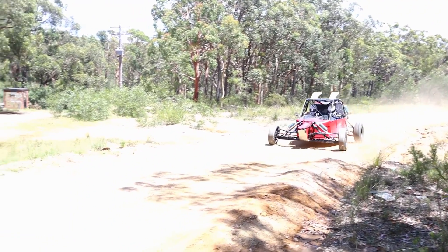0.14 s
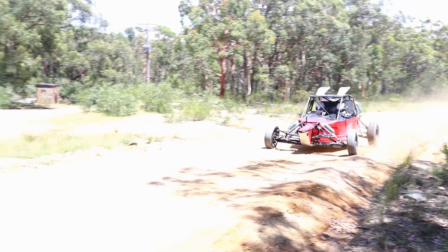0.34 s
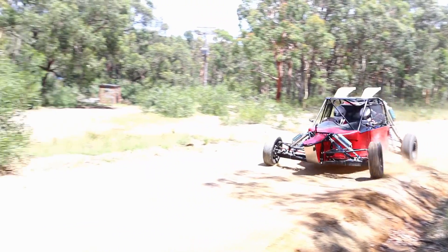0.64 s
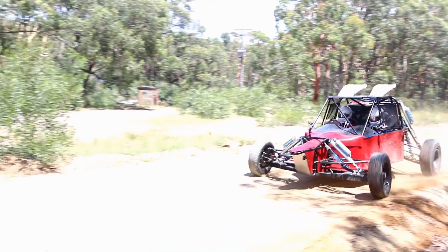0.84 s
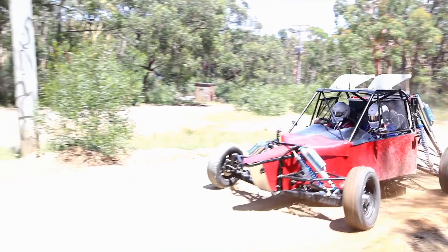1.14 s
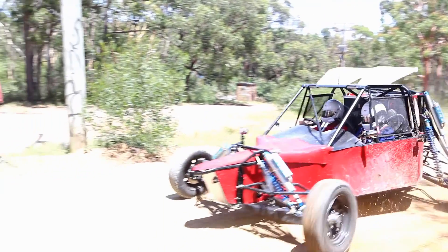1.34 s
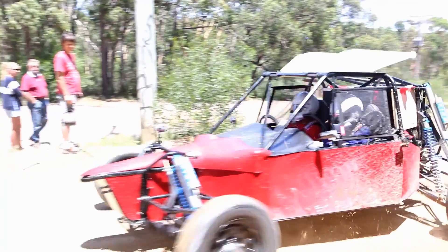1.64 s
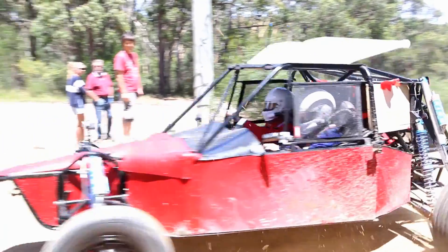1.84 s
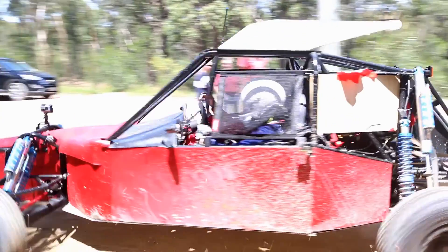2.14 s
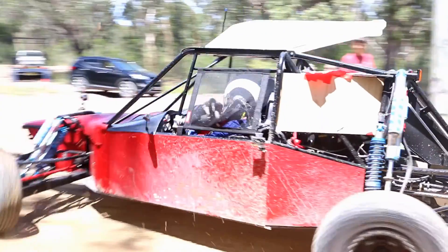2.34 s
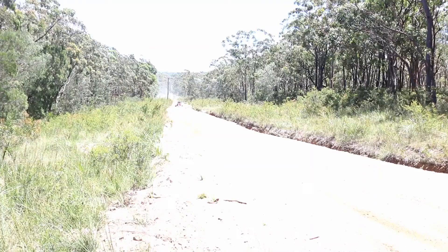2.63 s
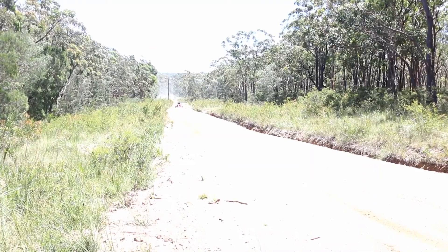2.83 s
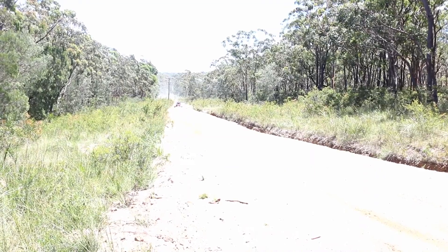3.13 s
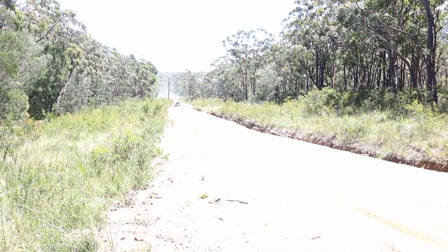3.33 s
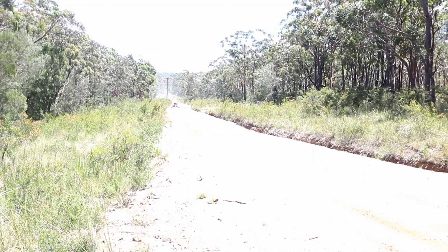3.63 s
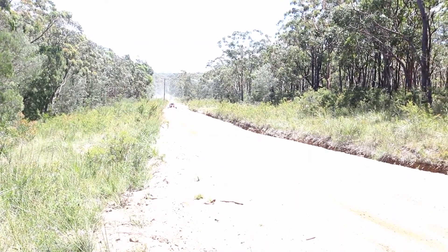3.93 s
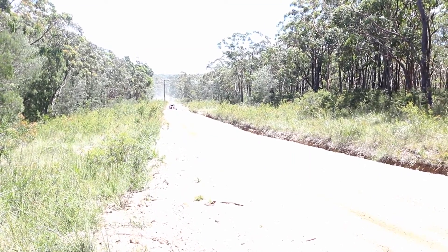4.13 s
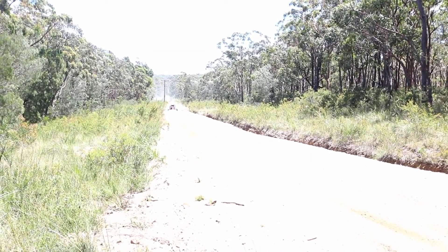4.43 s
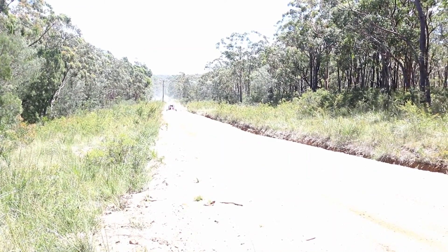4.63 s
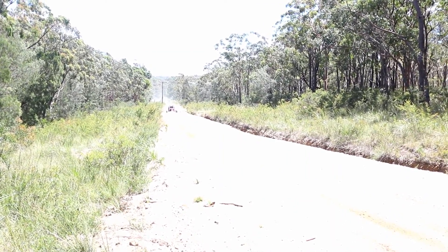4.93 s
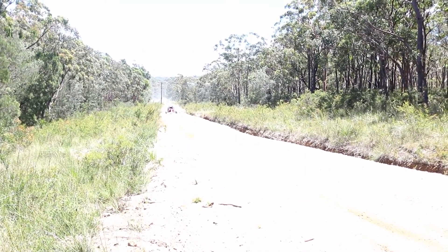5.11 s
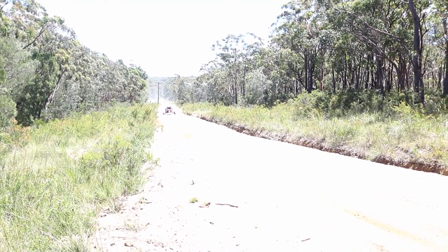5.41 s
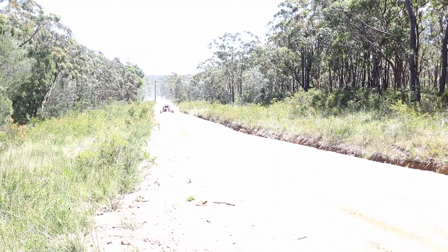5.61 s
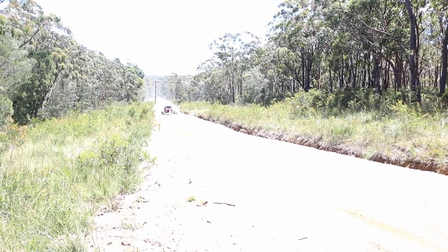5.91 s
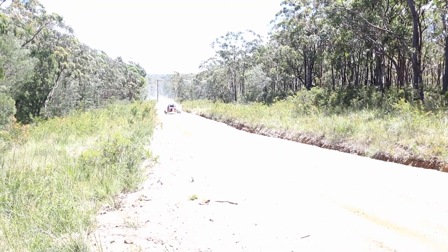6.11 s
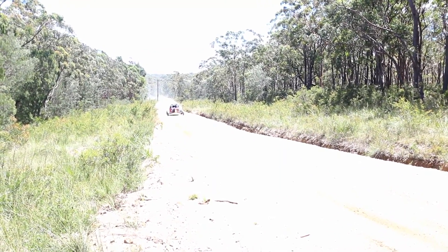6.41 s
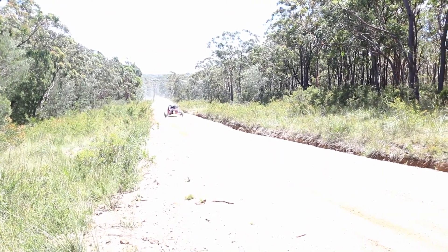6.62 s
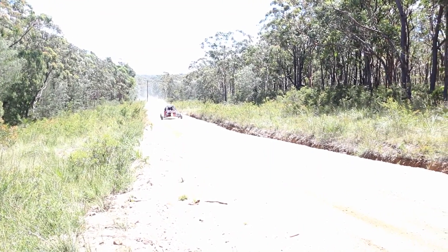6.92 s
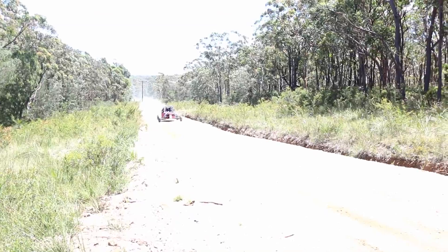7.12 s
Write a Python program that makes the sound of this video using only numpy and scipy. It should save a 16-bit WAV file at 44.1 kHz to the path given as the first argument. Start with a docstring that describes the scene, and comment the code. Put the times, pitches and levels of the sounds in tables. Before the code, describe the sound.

A close stereo outdoor pickup opens on a buggy coasting into a dirt bend, its low, uneven four-cylinder burble falling in pitch. From about 0.1 to 1.6 s tyres scrub and judder with gritty surges and a hollow howl, while stones tick and spray, stronger on the right. At 1.0 s the throttle blips briefly; the revs jump, then sink again. Valve clatter and a thin, descending whine emerge from 1.6 s. Around 2.3 s the engine lugs and pulls away with rapid sharp cracks. At 2.7 s a hard cut: a much quieter, distant engine growls at high revs, climbing with brief lifts until 3.8 s. It eases, shifts up at about 4.2 s and drops in pitch, then climbs steadily, louder and nearer, its note wobbling over washboard, with a hissing roar peaking near 6.5 s. It lifts off at 6.9 s. Trees echo; forest air and faint insect rasps remain.

```python
"""A flat-four dirt buggy, close by: its exhaust burbles through a bend, blips once on the way and pulls away.
At 2.7 s the place changes: far off at first, it races up a forest straight, shifts up and lifts off.
Clicks from four uneven cylinders ring pipe resonances; at full throttle gliding harmonics make a growl.
Filtered noise gives the scrubbing tyres, valve clatter, stones, cracks and distant roar. Trunks echo the
exhaust, an insect rasps and forest air lies under both places. The microphone has two ports."""
import sys
import numpy as np
from scipy import signal
from scipy.fft import rfft, irfft
from scipy.io import wavfile
from scipy.ndimage import uniform_filter1d

SR = 44100
rng = np.random.default_rng(int(sys.argv[2]) if len(sys.argv) > 2 else 0)


def put_to_file(sound):
    """Save the sound as 16-bit audio at rate SR, in the file named by the first command-line argument."""
    columns = np.atleast_2d(sound).T  # one column per channel
    safe = np.clip(columns, -1, 1)
    whole_steps = np.round(safe * 32767)
    wavfile.write(sys.argv[1], SR, whole_steps.astype(np.int16))


N = 320166
T, HZ = np.arange(N) / SR, np.fft.rfftfreq(N, 1 / SR)
CUT_S = 2.706  # from the bend to the straight

# how the engine runs, by manner: per cylinder strength [relative] and lag_ms; pipe [pitch_hz, width_hz];
# rough [share of strength], jitter_ms; leak_db past the silencer, hum_db at the firing rate;
# order [multiple of engine speed] and tone_db of the clean tones
MANNERS = { "coast": dict(strength=[0.44, 0.38, 0.75, .7], lag_ms=[-1.2, 0.17, 1.75, 1.9],
           pipe=[(131.4, 50), (196, 39), (169, 240)],
           rough=0.031, jitter_ms=.04, leak_db=-56.5, hum_db=-15.5, order=[7, 9, 10, 12],
           tone_db=[-17, -11, -13, -16.5]), "overrun": dict(strength=[0.28, .35, 0.65, 1],
           lag_ms=[0, 0, 0, 0], pipe=[(132.5, 14), (198.5, 25.5), (169, 350)],
           rough=0.074, jitter_ms=0.054, leak_db=-49, hum_db=-18.5, order=[], tone_db=[]),
           "blip": dict(strength=[0.79, 0.62, 0.7, 0.35], lag_ms=[0.41, -0.21, 0.64, -1.5], pipe=[(145, 12),
           (205, 27), (295, 110)], rough=0.054, jitter_ms=0.72, leak_db=-32, hum_db=-23, order=[12],
           tone_db=[-7.5]), "lug": dict(strength=[0.41, 0.44, 0.25, 0.81], lag_ms=[2.5, 1, -4, 0],
           pipe=[(128, 30), (201, 27.5), (220, 1400)],
           rough=0.078, jitter_ms=0.094, leak_db=-60, hum_db=-17.5, order=[], tone_db=[]),
           "pull": dict(strength=[0.65, 0.7, 0.76, 1.5], lag_ms=[.2, .6, 0.0094, 0.0041], pipe=[(120, 40),
           (217, 100), (310, 110)], rough=.35, jitter_ms=0.65, leak_db=-22, hum_db=-34, order=[],
           tone_db=[]), "lift": dict(strength=[0.68, 0.3, 0.24, 0.081], lag_ms=[0, .48, 1.57, 2.24],
           pipe=[(132, 29), (212, 36.5), (302, 117)],
           rough=0.044, jitter_ms=0.21, leak_db=-57.5, hum_db=-29, order=[5], tone_db=[-17.5])}
# the driver's moves: start_s, manner, throttle_db
MOVES = [(0, "coast", 0), (0.998, "blip", 8), (1.037, "blip", 11), (1.128, "coast", 2.5),
         (1.63, "overrun", 4), (2.019, "coast", 1.5), (2.25, "lug", 8), (2.34, "lug", 9.5),
         (2.707, "pull", -3), (3.597, "lift", -21), (3.645, "pull", -5.5), (3.799, "lift", -10),
         (4.15, "pull", -6), (4.215, "pull", -2), (6.938, "lift", -6.5)]
# engine speed through the bend, sinking but for the blip and the final pull: time_s, speed_cycles_per_s
# (one cycle is four strokes)
BEND_SPEED = [(0, 22.54), (.16, 21.86), (.4, 19.59), (.66, 16.25), (.85, 14.92), (1, 13.14), (1.06, 17.17),
              (1.13, 18.3), (1.35, 16.49), (1.6, 14.51), (1.9, 12.37), (2.25, 9.85), (2.4, 10.51),
              (2.7, 12.18)]
# engine speed up the straight, falling at the upshift; before wheel hop: time_s, speed_cycles_per_s
STRAIGHT_SPEED = [(2.71, 28.6), (2.78, 29.1), (2.86, 30.9), (2.97, 32.4), (3.13, 32.6), (3.38, 38.1),
                  (3.48, 38.6), (3.54, 43.2), (3.61, 40.6), (3.65, 42.4), (3.71, 41.1), (3.8, 44.2),
                  (3.87, 44.6), (4.16, 40.8), (4.22, 29.9), (4.3, 28.7), (4.37, 26.5), (4.55, 26.2),
                  (4.63, 24.8), (5, 26.43), (5.3, 27.06), (5.55, 28.1), (5.8, 30.1), (6.11, 32.2),
                  (6.19, 35.2), (6.3, 37), (6.76, 37.3), (6.85, 38.7), (6.93, 41), (7.26, 37)]
# washboard stretches, where the wheels hop and the revs swing: start_s, end_s, depth [share of speed]
WASHBOARD = [(4.37, 4.85, .014), (5.8, 6.085, .04), (6.23, 6.73, .022)]
HOP_HZ = 7
# exhaust level by distance, before throttle and revs: time_s, level_db
BEND_NEARNESS = [(0, -38.5), (1.3, -38), (2.7, -38.5)]
STRAIGHT_NEARNESS = [(2.71, -49.5), (3.2, -50.5), (3.5, -48), (4.2, -50), (4.55, -49), (5.1, -46.5),
                     (5.7, -40.5), (6, -41), (6.3, -39), (6.8, -40.5), (7.26, -44.5)]
REV_DB_PER_OCTAVE, CRUISE_HZ = 5.5, 20.3  # louder with the revs; no change at the cruising speed
CHAMBER_HZ, CHAMBER_WIDTH_HZ = 215, 104  # the silencer's chamber spreads each pulse without colouring it
HUM_LOW_HZ = 48.7  # the hum thins out below this firing rate
NEAR_ECHO_DB, STRAIGHT_ECHO_DB = -14, -14  # trees round the bend, trees along the straight
# microphone ports, close and far: likeness [pitch_hz, 0-1], balance [pitch_hz, left_minus_right_db],
# phase [pitch_hz, right_lag_radians]
NEAR_PORTS = ([(150, 1), (950, .99), (2400, .85), (6000, .4), (15000, .3)], [(400, .6), (1000, .4),
              (2400, -1), (6000, -5.5), (15000, -13)], [(200, 0), (1000, -.3), (2000, -.7), (3600, -1.3),
              (6000, -2.2)])
FAR_PORTS = ([(60, .95), (400, .99), (950, .95), (2400, .6), (6000, .1)], [(60, 1), (400, .3),
             (6000, -1.5)], [(500, 0), (2400, .2), (7500, 1.5)])
# valve gear and fan close by: time_s, level_db
CLATTER_LEVEL = [(0, -53.5), (.8, -69.5), (1.6, -53), (1.8, -54.5), (1.95, -52), (2.2, -55.5), (2.4, -51),
                 (2.55, -52.5), (2.7, -49.5)]
# their colour: pitch_hz, relative_db
CLATTER_COLOUR = [(200, 2.5), (330, 7.5), (450, 1.5), (620, -8.5), (980, -3.5), (1660, -14.5), (2330, -14),
                  (3720, -18.5), (4500, -18), (6220, -23.5), (11700, -41), (15000, -54.5)]
# a thin whine: time_s, pitch_hz, level_db
WHINE = [(1.5, 4750, -90), (1.8, 4660, -66.5), (2.05, 4620, -66), (2.2, 4580, -74), (2.4, 4380, -64.5),
         (2.7, 4340, -63)]
# colour of the forest air: pitch_hz, relative_db
FOREST_COLOUR = [(30, -34), (70, -2), (150, 7), (400, -13.5), (1000, -10.5), (3000, -23.5), (6000, -34.5),
                 (15000, -60)]
# tyres sliding on dirt, before trim: time_s, level_db
SCRUB = [(0.13, -56), (0.138, -49), (0.232, -41.5), (0.306, -44), (0.342, -37.5), (0.416, -41),
         (0.452, -37.5), (0.522, -40), (0.612, -50.5), (0.666, -41.5), (0.768, -48.5), (0.834, -42.5),
         (1.074, -43), (1.264, -38.5), (1.288, -43.5), (1.546, -43.5), (1.562, -50.5), (1.6, -48.5)]
GRIP_S = .2  # the slide builds up until this time
# the tread catches and surges, before trim: time_s, peak_db
BITES = [(0.168, -50), (0.332, -47), (0.448, -41), (0.5, -48), (0.633, -41), (0.692, -41), (1.178, -40),
         (1.208, -41), (1.236, -43), (1.327, -44), (1.51, -46), (1.581, -36)]
# tyre colour entering and leaving the bend: pitch_hz, relative_db
SCRUB_IN = [(100, -40), (250, -2), (400, -13), (520, -20.5), (700, -5), (920, -2), (1150, -14.5),
            (1420, -8), (1750, -20), (2050, -19.5), (3000, -27), (6000, -34), (10000, -49), (15000, -60)]
SCRUB_OUT = [(100, -38), (250, -4), (470, -8), (610, -13), (800, -4), (1020, -1), (1250, -18.5),
             (1700, -17), (3000, -25), (6000, -34.5), (10000, -54), (15000, -71)]
# larger stones hitting the chassis, before trim and balance: start_s, peak_db, pitch_hz
STONES = [(0.162, -47, 4970), (0.3726, -48, 5380), (0.483, -39.5, 3100), (0.51, -45, 3000),
          (0.7144, -58, 12000), (0.9028, -44.5, 4470), (1.2645, -44, 3500), (1.5934, -47, 4360),
          (1.7654, -48, 3270), (1.9114, -53, 5900), (1.974, -52, 4860), (2.155, -49.5, 5540)]
# smaller gravel at random during the slide: rate, middle level before trim, spread either way, middle pitch
GRAVEL_PER_S, GRAVEL_DB, GRAVEL_SPREAD_DB, GRAVEL_HZ = 15, -52, 4, 4400
# sharp exhaust cracks under load, before trim: start_s, peak_db
CRACKS = [(2.357, -50), (2.451, -50), (2.498, -45), (2.542, -44), (2.585, -43), (2.627, -41.5),
          (2.67, -41.5)]
# harmonics of the full-throttle note: order [multiple of engine speed], relative_db
DRONE_ORDERS = [(3, -19.5), (4, -7), (5, -11), (6, -22), (7, -10.5), (8, -0.5), (9, -12.5), (10, -13),
                (11, -16), (12, -6.5), (14, -19), (16, -5.5), (17, -10), (18, -15), (21, -11.5), (33, -13)]
# the pipe's colour on that note: pitch_hz, relative_db
DRONE_PIPE = [(70, -18), (100, -10), (150, 0), (200, 2.5), (300, 1.5), (335, -3), (375, -11), (430, -12),
              (500, -18.5), (550, -25.5), (610, -16.5), (700, -24), (830, -24), (1000, -28.5), (1400, -34)]
PULL_ROUGH_DB = -16  # uneven firings under that note
# roar of the approaching buggy, before trim: time_s, level_db
ROAR_LEVEL = [(2.88, -72), (3.15, -67.5), (3.7, -57), (3.88, -58.5), (4.12, -66.5), (4.19, -63.5),
              (4.32, -66.5), (4.7, -65), (6.1, -55.5), (6.5, -47.5), (6.8, -48.5), (7.12, -54)]
# its full colour, and the harsher one before the upshift: pitch_hz, relative_db
ROAR_FULL = [(30, -30.5), (75, -9.5), (150, -12), (300, -4.5), (450, -5), (650, -7.5), (940, -11),
             (1460, -19), (2400, -23.5), (4600, -30.5), (7000, -37), (11600, -64.5), (14000, -73)]
ROAR_HARSH = [(30, -24), (75, -10), (150, -25), (300, -3), (450, -4), (650, -10), (900, -8.5), (1350, -17),
              (1800, -18), (2350, -19.5), (3000, -26), (4600, -27), (7000, -38.5), (11600, -57.5),
              (14000, -68)]
RASP = .5  # exhaust buzz against the hiss in the roar
# insect calls: peak_s, level_db
INSECT = [(3.02, -84), (4.37, -85.5), (5.76, -87), (7.17, -85.5)]


def amp(db):
    """Decibels to gain."""
    return 10 ** (np.asarray(db) / 20)


def evened(x):
    """Scales to rms 1."""
    return x / np.sqrt(np.mean(x ** 2) + 1e-20)


def curve(rows, axis=1):
    """One column of a time table, at every sample."""
    rows = np.asarray(rows)
    return np.interp(T, rows[:, 0], rows[:, axis])


def read(points):
    """A frequency table, at every bin, on a log frequency scale."""
    hz, value = np.transpose(points)
    return np.interp(np.log(HZ + 1), np.log(hz + 1), value)


def between(start, end, fade=0.0026):
    """A gate with short ramps."""
    return np.clip((T - start) / fade + .5, 0, 1) * np.clip((end - T) / fade + .5, 0, 1)


def wander(hz):
    """Random drift of rms 1, fading out above the given rate."""
    return evened(irfft(rfft(rng.standard_normal(N)) / (1 + (HZ / hz) ** 4), N))


def resonance(hz, width):
    """Response of one damped mode."""
    return 1j * HZ * width / (hz ** 2 - HZ ** 2 + 1j * HZ * width)


def at_ports(pair, colour, ports):
    """Colours two unrelated signals and makes them as alike as the ports hear them; their mean has rms 1."""
    same, balance_db, phase = map(read, ports)
    same = np.clip(same, 0, 1)
    left, other = rfft(pair) * colour
    right = (same * left + np.sqrt(1 - same ** 2) * other) * np.exp(-1j * phase)
    out = irfft(np.array([left * amp(balance_db / 2), right * amp(-balance_db / 2)]), N)
    return out / np.std(out.mean(0))


def hiss(envelope=1):
    """Two unrelated white noises under one envelope."""
    return rng.standard_normal((2, N)) * envelope


def fuzzy_tone(hz, width_hz):
    """A narrow band of noise that follows a pitch curve."""
    turn = 2 * np.pi * np.cumsum(hz) / SR
    return wander(width_hz) * np.cos(turn) + wander(width_hz) * np.sin(turn)


def add(mix, s, sound):
    """Adds a stereo sound at a time."""
    part = mix[:, max(round(s * SR), 0):][:, :sound.shape[1]]
    part += sound[:, :part.shape[1]]


def speed():
    """Engine cycles per second, swinging as the wheels hop over the washboard."""
    hop = sum(depth * np.sin(2 * np.pi * HOP_HZ * (T - start)) * between(start, end)
              for start, end, depth in WASHBOARD)
    return curve(BEND_SPEED + STRAIGHT_SPEED) * (1 + hop)


def crank():
    """Engine cycles counted on from a set point in the cycle."""
    return np.cumsum(speed()) / SR - .33


def firings(strength, lag_ms, rough, jitter_ms, surge_db=.8, sway=.003, **_):
    """One click a firing; unequal headers delay some cylinders, which makes the flat-four burble."""
    revs, cycles = speed(), crank()
    stroke = np.arange(-1, int(cycles[-1] * len(strength)))
    cylinder = stroke % len(strength)
    chance = rng.standard_normal((len(stroke), 2))
    s = np.interp(stroke / len(strength), cycles, T)
    s += (np.take(lag_ms, cylinder) + jitter_ms * chance[:, 0]) / 1000
    s += sway / np.interp(s, T, revs) * np.interp(s, T, wander(9.6))  # bumps tug at the crank
    clicks = np.zeros(N)
    place = np.clip(s * SR, 0, N - 1).astype(int)
    clicks[place] = np.take(strength, cylinder) * (1 + rough * chance[:, 1])
    return clicks * amp(surge_db * wander(15.0))


def puffs(clicks, decay_s):
    """The gas flow that dies away after each click; rms 1."""
    return evened(signal.lfilter([1], [1, -np.exp(-1 / (decay_s * SR))], clicks))


def tones(order, tone_db, centre_hz=170, octaves=0.88, waver_db=4.0, thump_at=0.6335, **_):
    """Clean multiples of engine speed, in step at one point of the cycle; strongest in the pipe's boom."""
    revs, turn = speed(), 2 * np.pi * (crank() - thump_at)
    total = 0
    for k, db in zip(np.round(order), tone_db):
        in_boom = np.exp(-(np.log2(k * revs / centre_hz) / octaves) ** 2)
        total = total + np.sqrt(2) * amp(db + waver_db * wander(7.8)) * in_boom * np.cos(k * turn)
    return total


def exhaust(manner, turbulence=.105, leak_hz=450, leak_width_hz=420, leak_top_hz=950):
    """Clicks and turbulent puffs ring the pipe; a little of each edge leaks straight out. Steady rms 1."""
    clicks = firings(**manner)
    drive = evened(clicks) + turbulence * puffs(clicks, 0.066) * rng.standard_normal(N)
    pipe = np.prod([resonance(hz, width) for hz, width in manner["pipe"]], axis=0)
    chamber = 1 - 2 * resonance(CHAMBER_HZ, CHAMBER_WIDTH_HZ)  # delays only
    # the silencer rounds off each edge
    leak = resonance(leak_hz, leak_width_hz) ** 2 / (1 + (HZ / leak_top_hz) ** 4)
    response = pipe / abs(pipe).max() * chamber + amp(manner["leak_db"]) * leak
    ringing = irfft(rfft(drive) * response, N)
    power = uniform_filter1d(uniform_filter1d(ringing ** 2, size=SR // 8), size=SR // 10)
    steady = ringing / np.sqrt(abs(power) + 1e-12)
    firing_hz = len(manner["strength"]) * speed()
    hum = np.sin(2 * np.pi * np.cumsum(firing_hz) / SR) / (1 + (HUM_LOW_HZ / firing_hz) ** 4)
    boom = steady + amp(manner["hum_db"] + 2.0 * wander(28)) * evened(hum)
    return evened(boom + tones(**manner)), clicks


def engine():
    """Each move switches the manner of running; loudness follows throttle, revs and nearness."""
    running = {name: np.array(exhaust(manner)) for name, manner in MANNERS.items()}
    running["pull"][0] = drone() + amp(PULL_ROUGH_DB) * running["pull"][0]
    ends = [move[0] for move in MOVES[1:]] + [N / SR]
    boom, clicks = np.zeros((2, N))
    for (s, name, db), end in zip(MOVES, ends):
        gate = between(s, end, fade=0.0056)
        boom += running[name][0] * gate * amp(db)
        clicks += running[name][1] * gate
    nearness_db = np.where(T < CUT_S, curve(BEND_NEARNESS), curve(STRAIGHT_NEARNESS))
    return boom * amp(nearness_db + REV_DB_PER_OCTAVE * np.log2(speed() / CRUISE_HZ)), clicks


def machinery(clicks, beat=0.17, rattle_db=2):
    """Valve clatter and a whine, as noise bands pulsing with the firings; the whine sinks in pitch."""
    strokes = evened((1 + beat * puffs(clicks, 0.0079)) * amp(rattle_db * wander(100)))
    clatter = at_ports(hiss(strokes), amp(read(CLATTER_COLOUR)), NEAR_PORTS) * amp(curve(CLATTER_LEVEL))
    bands = np.array([fuzzy_tone(curve(WHINE), width_hz=hz) for hz in (45, 130)])
    # the bands' difference sets the ports apart
    whine = evened(bands.sum(0) + .5 * (bands[0] - bands[1]) * np.array([[1], [-1]]))
    pulsing = evened(.2 + puffs(clicks, .008))
    return clatter + pulsing * whine * amp(curve(WHINE, axis=2))


def forest_air(level_db):
    """The quiet bed of the forest: steady coloured noise across the ports."""
    return amp(level_db) * at_ports(hiss(), amp(read(FOREST_COLOUR)), FAR_PORTS)


def trees(x, t60=1.0, spread=0.2):
    """Scattered echoes from the trunks, after 20 ms, slightly different in each port."""
    t = T[:SR]
    tail = rng.standard_normal((2, SR)) * amp(-60 * t / t60) * (t > .02)
    tail = tail[0] + spread * tail[1] * np.array([[1], [-1]])
    return signal.fftconvolve(x[None], tail / np.linalg.norm(tail[0]), axes=1)[:, :N]


def bites(decay_s=0.0089, bite_db=-7):
    """Gain of the sudden surges as the tread catches in the dirt."""
    return sum(amp(db + bite_db) * between(s, CUT_S, fade=.002) * np.exp(-abs(T - s) / decay_s)
               for s, db in BITES)


def tyres(judder_db=1.0, judder_hz=70, grit_db=1.5, scrub_db=-1.43, howl_db=-11, howl_in_hz=920,
          howl_out_hz=1020, howl_width_hz=45, howl_drift=0.05005):
    """Tread judders over the dirt, crushing grit and howling; the colour shifts as the buggy turns."""
    grains = evened(amp(judder_db * wander(judder_hz) + grit_db * wander(1600)))
    turned = np.clip((T - .65) / .5, 0, 1)  # 0 entering, 1 leaving
    entering, leaving = (at_ports(hiss(grains), amp(read(c)), NEAR_PORTS) for c in (SCRUB_IN, SCRUB_OUT))
    howl_hz = (howl_in_hz + (howl_out_hz - howl_in_hz) * turned) * (1 + howl_drift * wander(12.33))
    howl = grains * fuzzy_tone(howl_hz, howl_width_hz)
    scrub = np.sqrt(1 - turned) * entering + np.sqrt(turned) * leaving + amp(howl_db) * howl
    sliding = between(0.105, 1.606, fade=0.03) * np.clip(T / GRIP_S, 0, 1) ** 2
    return scrub * (amp(curve(SCRUB) + scrub_db) + bites()) * sliding


def stones(rise_s=0.00026, ring_s=0.0014, spray=0.44, spray_s=0.019, stone_db=2, right_db=3.5, top_hz=10000):
    """Each stone is a noise burst ticking on the tubing, then a spray of sand; louder on the right."""
    out, t = np.zeros((2, N)), T[:SR // 12]
    slide_start, slide_s = SCRUB[2][0], SCRUB[-1][0] - SCRUB[2][0]
    chance = rng.random((round(GRAVEL_PER_S * slide_s), 3))
    gravel = [(slide_start + slide_s * when, GRAVEL_DB + GRAVEL_SPREAD_DB * (2 * size - 1),
               GRAVEL_HZ * (.5 + pitch)) for when, size, pitch in chance]
    envelope = (1 - np.exp(-t / rise_s)) * (np.exp(-t / ring_s) + spray * np.exp(-t / spray_s))
    for s, db, hz in list(STONES) + gravel:
        burst = rng.standard_normal((2, len(t))) * envelope
        tick = signal.lfilter(*signal.iirpeak(min(hz, SR / 3), 1.6, fs=SR), burst)
        tick = signal.lfilter(*signal.butter(1, min(top_hz, SR / 3), fs=SR), tick)
        add(out, s, tick / abs(tick).max() * amp(db + stone_db))
    return out * amp([[-right_db], [right_db]])


def cracks(rise_s=.0022, crack_db=0, dull_hz=1500, bark_hz=980, bark_q=5, bark_s=.012, bark_db=2.5):
    """Hard firings spit a short broad crack, and the gas behind it barks in the tailpipe."""
    out, t = np.zeros((2, N)), T[:SR // 15]
    for s, db in CRACKS:
        gas = rng.standard_normal((2, len(t))) * t * np.exp(-t / rise_s)
        wide = gas[0] + 7.1 * gas[1] * np.array([[1], [-1]])  # mostly opposite in the two ports
        spit = signal.lfilter(*signal.butter(1, [400, dull_hz], "bandpass", fs=SR), wide)
        puff = rng.standard_normal(len(t)) * np.exp(-t / bark_s)
        bark = signal.lfilter(*signal.iirpeak(bark_hz, bark_q, fs=SR), puff)
        add(out, s, spit / abs(spit).max() * amp(db + crack_db) + bark / abs(bark).max() * amp(db + bark_db))
    return out


def drone(count=34, smear=.7, merge=.75, waver_db=.9, scatter_db=2.2, shake=.005):
    """Full-throttle firings merge into a growl, smoother at high revs; harmonics glide through the pipe."""
    revs, turn = speed(), 2 * np.pi * (crank() + shake * wander(19))
    air = [wander(6) for _ in range(5)]
    merged = merge * np.clip((revs - 27) / 4, 0, 1)  # phase shift of the odd orders
    note = np.zeros(N)
    for k in range(3, count):
        db = np.interp(k, *np.transpose(DRONE_ORDERS)) + np.interp(k * revs, *np.transpose(DRONE_PIPE))
        db += (waver_db + scatter_db * k / count) * np.roll(air[k % len(air)], k * SR // 2)
        note += amp(db) * np.cos(k * turn - smear * k ** 2 - k % 2 * merged)
    return note / np.std(note[T > CUT_S])


def rasp(clicks, ring_s=.007):
    """Every firing rattles the pipe in the same way, which gives a buzz rich in harmonics; rms 1."""
    t = T[:SR // 25]
    rattle = rng.standard_normal(len(t)) * np.exp(-t / ring_s)
    return evened(signal.fftconvolve(clicks, rattle)[:N])


def roar(clicks, beat=0.17, flutter_db=0.03, roar_db=-3.5):
    """Exhaust rasp over pulsing tyre hiss, stirred by the air on its long way; harsher before the upshift."""
    flow = hiss(evened(1 + beat * puffs(clicks, 0.016))) + RASP * np.array([rasp(clicks), rasp(clicks)])
    harsh, full = (at_ports(flow * amp(flutter_db * wander(25)), amp(read(c)), FAR_PORTS)
                   for c in (ROAR_HARSH, ROAR_FULL))
    shifted = np.clip((T - 4.1) / .5, 0, 1)
    return ((1 - shifted) * harsh + shifted * full) * amp(curve(ROAR_LEVEL) + roar_db)


def insect(hz=8300, width=4800, swell_s=0.099):
    """A high rasp of filtered noise that swells and fades at nearly even intervals."""
    calls = sum(amp(db) * np.exp(-((T - s) / swell_s) ** 2) for s, db in INSECT)
    return at_ports(hiss(), resonance(hz, width) ** 3, FAR_PORTS) * calls


def scene(forest_db=-69):
    """The bend close to the microphone, then the distant approach up the straight."""
    boom, clicks = engine()
    near = between(-1, CUT_S, fade=0.0015)
    close = tyres() + machinery(clicks) + stones() + cracks() + amp(NEAR_ECHO_DB) * trees(boom * near)
    distant = roar(clicks) + insect() + amp(STRAIGHT_ECHO_DB) * trees(boom * (1 - near))
    direct = boom * amp([[.2], [-.2]])  # a touch to the left
    return direct + near * close + (1 - near) * distant + forest_air(forest_db)


def record(dry):
    """The recorder's band limit, a steep low-pass at 15.7 kHz."""
    band = signal.firwin(511, 15700, window=("kaiser", 9), fs=SR)
    return signal.oaconvolve(dry, band[None], "same")


dry = scene()
out = record(dry)
put_to_file(out)
```